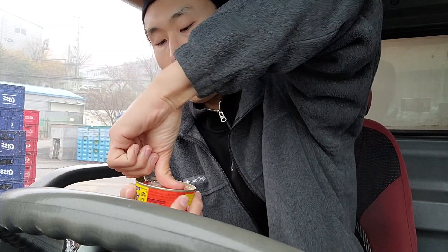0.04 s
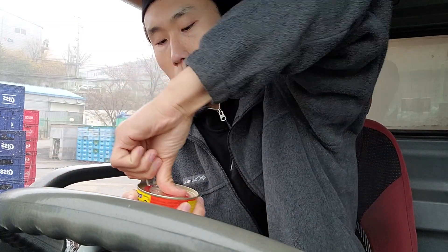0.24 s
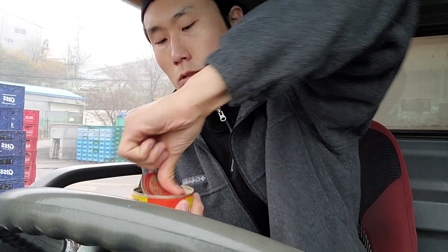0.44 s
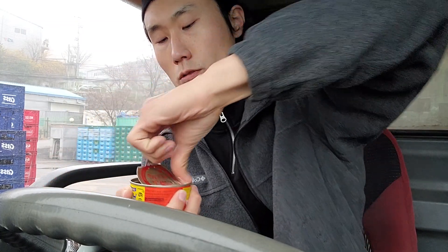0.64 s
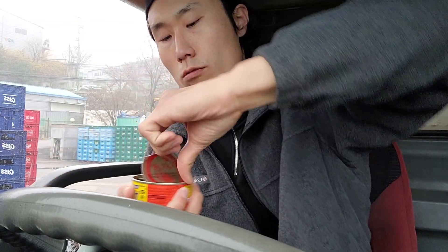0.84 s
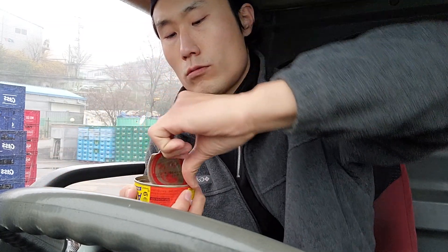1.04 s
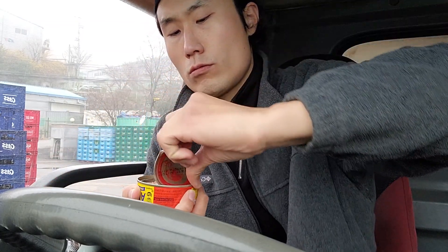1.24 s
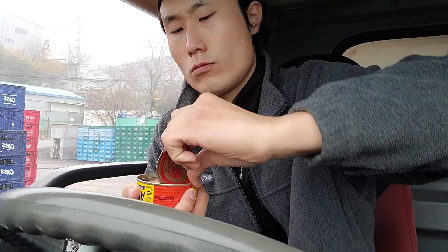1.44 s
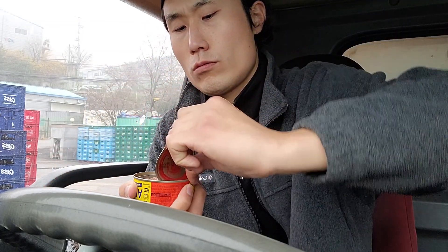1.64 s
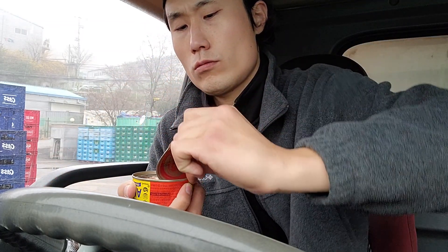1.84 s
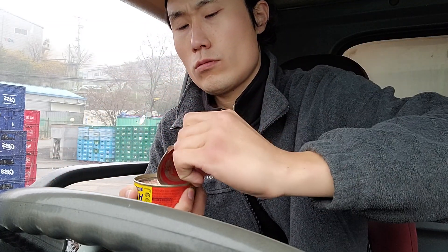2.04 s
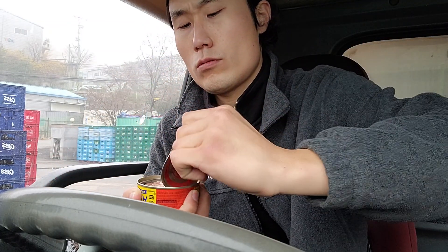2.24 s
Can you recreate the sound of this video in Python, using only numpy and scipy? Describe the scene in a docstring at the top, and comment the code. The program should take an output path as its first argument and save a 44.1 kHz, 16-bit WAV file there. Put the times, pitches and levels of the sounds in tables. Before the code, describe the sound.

Thin metal can lid cracks and tears in two quick pulls with bright ringing and gritty crackle, after a soft sleeve rustle; quieter pings, scrapes and ticks follow, close and dry, with a faint low vehicle-cab hum.

```python
"""Opening a ring-pull can in a parked cab

The scored rim cracks, then two pulls rip the lid: trains of tiny slips ring the thin metal while finer
fractures crackle. The bent lid flexes, ticks, scrapes and creases as brief slip clusters and clean rings.
Coloured noise makes a brushing sleeve, a dull rub and the cab's faint floor; a gliding sine is the low hum.
Decaying stereo noise gives the close cab's echoes."""
import sys
import numpy as np
from scipy import signal
from scipy.fft import rfft, irfft, next_fast_len
from scipy.io import wavfile
from scipy.ndimage import uniform_filter1d, map_coordinates

SR = 44100
rng = np.random.default_rng(int(sys.argv[2]) if len(sys.argv) > 2 else 0)


def put_to_file(sound):
    """Save the sound as 16-bit audio at rate SR, in the file named by the first command-line argument."""
    columns = np.atleast_2d(sound).T  # one column per channel
    safe = np.clip(columns, -1, 1)
    whole_steps = np.round(safe * 32767)
    wavfile.write(sys.argv[1], SR, whole_steps.astype(np.int16))


N = 101429
IR_SIZE = 8192  # samples

# lid resonances, nearly flat and curled up: centre_hz, width_hz, level_db
FLAT_LID_MODES = [(930, 90, -29), (1642, 80, -3), (1798.5, 45, 7.5), (1962, 25, 3.5), (2420, 96, -0.5),
                  (2850, 16, -7.5), (3184, 17, 0), (3447, 20, -4), (4045, 30, -9)]
CURLED_LID_MODES = [(335, 110, -23.5), (558, 140, -22), (1435, 43, -5.5), (1615, 81, -5), (1840, 61, 10.5),
                    (2175, 120, 0.5), (2356, 96, -6), (2419, 44, 1)]
# lid hinge resonances: centre_hz, width_hz, level_db
HINGE_RESONANCES = [(1316, 23, 1.5), (1740, 110, 0.5), (2910, 90, -2.5), (4380, 54, 5.5), (4833, 66, -2)]
# dry tick spectrum: freq_hz, level_db
DRY_TICK_COLOUR = [(100, -44), (300, 7.5), (800, -1.5), (1400, 3.5), (3000, -1.5), (7400, -13), (8900, -12),
                   (16000, -25.5)]

# slip rates are 1 / median interval; scatter is in slip size
SLIPS_PER_S, SLIP_SCATTER_DB = 420, 8
GRIT_PER_S, GRIT_SCATTER_DB = 750, 5
BLOW_S = .004  # a blow's or ping's dB is its level over this time
CRACK_S, SNAP_S, JERK_S = .0014, .0012, .0008  # slip cluster lengths; a jerk is almost a single slip
HINGE_RING_DB, CREASE_RING_DB, CRACK_RING_DB = -3, -3, -2  # metal ring re dry click
# echoes re direct sound
CAB_DB, LID_CAB_DB, SNAP_CAB_DB, CRACK_CAB_DB, TICK_CAB_DB = 6, -9, -3, -4.5, -0.5


def amp(db):
    """Decibels to gain."""
    return 10 ** (np.asarray(db) / 20)


def unit(x):
    """Scale to rms 1."""
    return x / np.sqrt(np.mean(x ** 2) + 1e-20)


def along(points, hz):
    """Interpolate (freq_hz, value) points on a log frequency axis."""
    freq_hz, value = np.transpose(points)
    return np.interp(np.log(hz + 1), np.log(freq_hz + 1), value)


def curves(rows, outside=None):
    """Interpolate each column after the time to one value per sample."""
    time_s, *columns = np.transpose(rows)
    t = np.arange(N) / SR
    return [np.interp(t, time_s, column, outside, outside) for column in columns]


def filtered(x, response):
    """Multiply the spectrum of x by a response of frequency."""
    n = x.shape[-1]
    m = next_fast_len(n + IR_SIZE)
    spectrum = rfft(x, m) * response(np.fft.rfftfreq(m, 1 / SR))
    return irfft(spectrum, m)[..., :n]


def ring(modes):
    """Impulse response of parallel resonances with alternating signs, energy 1."""
    f = np.fft.rfftfreq(IR_SIZE, 1 / SR)
    response = 0
    for k, (centre, width, db) in enumerate(modes):
        damping = 1j * f * width
        response = response + (-1) ** k * amp(db) * damping / (centre * centre - f * f + damping)
    h = irfft(response)
    h[IR_SIZE // 2:] = 0
    return h / np.linalg.norm(h)


def click(colour, tilt_db_per_octave=0):
    """Minimum-phase impulse of the given colour, energy 1, made by folding the cepstrum."""
    pivot_hz = 4600
    f = np.fft.rfftfreq(IR_SIZE, 1 / SR)
    octaves = np.log2(np.maximum(f / pivot_hz, 1 / 8))  # tilt stops 3 octaves below the pivot
    cepstrum = irfft(np.log(amp(along(colour, f) + tilt_db_per_octave * octaves)))
    cepstrum[1:IR_SIZE // 2] *= 2
    cepstrum[IR_SIZE // 2 + 1:] = 0
    h = irfft(np.exp(rfft(cepstrum)))
    return h / np.linalg.norm(h)


def diffuse(size):
    """Stereo noise, alike in the bass and unrelated in the treble, from weighted mid and side."""
    # freq_hz, left_right_correlation
    likeness = [(100, 0.8), (800, 0)]

    def mid_side_gains(hz):
        angle_rad = np.arccos(np.clip(along(likeness, hz), -1, 1)) / 2
        return np.array([np.cos(angle_rad), np.sin(angle_rad)])

    mid, side = filtered(rng.standard_normal((2, size)), mid_side_gains)
    return np.array([mid + side, mid - side])


def rush(colour):
    """Coloured stereo noise, rms 1."""
    return unit(filtered(diffuse(N), lambda hz: amp(along(colour, hz))))


def in_cab(x, echo_db):
    """Direct sound plus a short dense decaying answer from the cab's glass and panels."""
    t60_s, build_up_s = .07, .001
    t = np.arange(IR_SIZE) / SR
    tail = diffuse(IR_SIZE) * amp(-60 * t / t60_s) * (1 - np.exp(-t / build_up_s))
    h = amp(echo_db) * tail / np.linalg.norm(tail[0])
    h[:, 0] += 1
    return signal.fftconvolve(x[None], h / np.linalg.norm(h[0]), axes=1)[:, :N]


def placed(sound, start_s):
    """Put a stereo sound at its start time."""
    return np.pad(sound, ((0, 0), (round(start_s * SR), N)))[:, :N]


def blow(start_s, db, length_s, body, echo_db):
    """A brief dying cluster of separate slips excites a body."""
    u = np.arange(IR_SIZE // 2) / SR / length_s
    slips = rng.standard_normal(len(u)) ** 5 * u ** .2 * np.exp(-2 * u)  # 5th power: sparse spikes
    sound = in_cab(signal.fftconvolve(slips, body), echo_db)
    sound = amp(db) * sound * np.sqrt(2 * BLOW_S * SR / np.sum(sound ** 2))
    return placed(sound, start_s)


def ping(start_s, db, modes):
    """A clean impulse rings the metal, its modes in slightly new proportions each time."""
    mode_scatter_db = 3
    varied = [(hz, width, level + mode_scatter_db * rng.standard_normal()) for hz, width, level in modes]
    sound = in_cab(amp(db) * np.sqrt(BLOW_S * SR) * ring(varied), LID_CAB_DB)
    return placed(sound, start_s)


def slip_train(rate_per_s, scatter_db):
    """Stick-slip impulses at uneven intervals, of uneven size and random sign, rms 1."""
    draws = rng.standard_normal((12000, 2))
    intervals_s = np.exp(.5 * draws[:, 0]) / rate_per_s
    at = (np.cumsum(intervals_s) * SR).astype(int)
    sizes = amp(scatter_db * np.clip(draws[:, 1], -2, 2)) * rng.choice([-1, 1], len(at))
    return unit(np.bincount(at[at < N], sizes[at < N], N))


def hum():
    """A sine of gliding pitch swells and sags over faint cab noise."""
    # time_s, level_db
    hum_level = [(0, -55.5), (.06, -52), (.11, -65.5), (.2, -47), (.3, -51.5), (.5, -63), (.67, -46),
                 (.84, -50), (1.0, -62), (1.13, -63), (1.31, -49), (1.72, -58.5), (1.8, -77), (1.95, -57.5),
                 (2.3, -56)]
    # time_s, pitch_hz
    hum_pitch = [(0, 52.5), (.2, 56.38), (1.05, 56.19), (2.3, 49.2)]
    # freq_hz, level_db
    noise_colour = [(20, -9), (65, -6), (140, -21.5), (330, -22), (520, -30), (1250, -27.5), (1900, -34),
                    (2800, -47), (6000, -57.5), (16000, -68)]
    noise_db = -59.5
    level_db, = curves(hum_level)
    pitch_hz, = curves(hum_pitch)
    tone = np.sqrt(2) * np.sin(2 * np.pi * np.cumsum(pitch_hz) / SR)
    return amp(level_db) * tone + amp(noise_db) * rush(noise_colour)


def sleeve():
    """Cloth friction hisses as the arm strains, and rubs dully when the grip shifts."""
    # time_s, level_db
    cloth_level = [(0, -60), (.13, -58), (.2, -51), (.3, -59.5), (.56, -62.5), (.64, -79.5), (.8, -79.5)]
    # freq_hz, level_db
    cloth_colour = [(200, -5.5), (900, -13.5), (1400, -2.5), (2600, 0.5), (3700, -5.5), (4400, 1.5),
                    (5200, -4.5), (8800, -6.5), (12000, -13), (16000, -14.5)]
    # freq_hz, level_db
    rub_colour = [(30, -6), (90, -5.5), (200, -2.5), (350, -9), (800, -25), (4000, -47.5)]
    rub_peak_s, rub_half_width_s, rub_db = 1.19, .045, -57
    level_db, = curves([*cloth_level, (N / SR, -150)])
    cloth = in_cab(amp(level_db) * rush(cloth_colour)[0], CAB_DB)
    t = np.arange(N) / SR
    rub_gain = amp(rub_db) / (1 + ((t - rub_peak_s) / rub_half_width_s) ** 2)
    return cloth + rub_gain * rush(rub_colour)


def rim_cracks():
    """The scored rim breaks in dry slip clusters that ring the still closed can."""
    # start_s, level_db
    crack_rows = [(0.2186, -22.5), (0.2204, -22.5), (.2262, -33)]
    # freq_hz, level_db
    crack_colour = [(400, -34.5), (1100, -13.5), (2000, -9), (4000, -0.5), (7000, -14), (8700, 2),
                    (10000, -9), (16000, -4.5)]
    # centre_hz, width_hz, level_db
    closed_can_modes = [(870, 94, -14.5), (1640, 90, -5.5), (2408, 75, 1), (3570, 120, -4.5),
                        (3970, 59, 8.5), (6050, 230, -4)]
    out = np.zeros((2, N))
    for start_s, db in crack_rows:
        out += blow(start_s, db, CRACK_S, click(crack_colour), CRACK_CAB_DB)
        out += ping(start_s, db + CRACK_RING_DB, closed_can_modes)
    return out


def lid_strains():
    """Short slip clusters ping the flat lid under strain before it rips."""
    # start_s, level_db
    strain_rows = [(0.284, -50.5), (0.3329, -40), (0.3482, -36.5)]
    return sum(blow(start_s, db, SNAP_S, ring(FLAT_LID_MODES), LID_CAB_DB) for start_s, db in strain_rows)


def pull(force, lid_modes, tear_colour):
    """The score line rips: coarse slips ring the lid, fine fractures crackle in clumps."""
    even_s, clump_s, clump_db = .009, .005, 3
    ring_db, tear_db = curves(force, outside=-150)
    slips = slip_train(SLIPS_PER_S, SLIP_SCATTER_DB)
    swing = unit(signal.fftconvolve(slips, ring(lid_modes))[:N])
    # even out the ring's loudness over about even_s, so that ring_db sets it
    local_power = np.abs(uniform_filter1d(swing ** 2, int(even_s * SR) + 1))
    swing = swing / np.sqrt(local_power + 1e-3)
    drift = uniform_filter1d(rng.standard_normal(N), int(clump_s * SR))
    drift = unit(drift - uniform_filter1d(drift, int(2 * clump_s * SR)))
    clump_gain = amp(clump_db * np.minimum(drift, 1))
    fractures = unit(clump_gain * slip_train(GRIT_PER_S, GRIT_SCATTER_DB))
    tearing = signal.fftconvolve(amp(tear_db) * fractures, click(tear_colour))[:N]
    return in_cab(amp(ring_db) * swing, LID_CAB_DB) + in_cab(tearing, CAB_DB)


def first_pull():
    """Slips and fractures rip the nearly flat lid."""
    # time_s, ring_db, tear_db
    force = [(.349, -68, -56.5), (.355, -42.5, -54), (.357, -27, -31.5), (.378, -27, -33.5),
             (.398, -27, -23.5), (.409, -26.5, -18.5), (.428, -22, -22.5), (.445, -30, -27.5),
             (.466, -43.5, -48), (.49, -40.5, -51.5), (.515, -73, -69)]
    # freq_hz, level_db
    tear_colour = [(100, -35.5), (300, -25), (700, -19), (1500, -5), (2650, -4.5), (3200, 5.5), (4100, 0),
                   (5200, -5.5), (7000, -18), (7900, -18.5), (8600, -5.5), (10200, -17), (12000, -11),
                   (16000, -16.5)]
    return pull(force, FLAT_LID_MODES, tear_colour)


def lid_snaps():
    """The lid gives way at the height of the first pull: slip clusters ring broad resonances."""
    # start_s, level_db
    snap_rows = [(0.422, -18), (.4250, -14.5)]
    # centre_hz, width_hz, level_db
    snap_modes = [(481.9, 150, -24), (888, 85, -9.5), (1100, 100, -10), (1723, 140, -2), (2480, 200, -6),
                  (3040, 200, 0.5), (3580, 120, 4), (4450, 99, -6)]
    return sum(blow(start_s, db, SNAP_S, ring(snap_modes), SNAP_CAB_DB) for start_s, db in snap_rows)


def second_pull():
    """Slips and fractures rip the curled lid."""
    # time_s, ring_db, tear_db
    force = [(.797, -27, -55), (.801, -54, -25.5), (.811, -43.5, -45.5), (.83, -31, -33.5),
             (.86, -29, -36.5), (.881, -52, -41), (.889, -46, -37.5), (.925, -78, -90)]
    # freq_hz, level_db
    tear_colour = [(100, -54), (320, 7.5), (800, -12), (2000, 9.5), (2750, 1.5), (3300, 9), (4300, 6.5),
                   (5400, 3), (7300, -4.5), (8800, 2), (10000, -4), (16000, -4)]
    return pull(force, CURLED_LID_MODES, tear_colour)


def lid_jerks():
    """The curled lid jerks free during the second pull, rung by very short slip clusters."""
    # start_s, level_db
    jerk_rows = [(0.7993, -27), (0.8129, -25), (.8255, -22.5), (.8370, -25.5), (0.853, -26), (0.8687, -26),
                 (.889, -27)]
    return sum(blow(start_s, db, JERK_S, ring(CURLED_LID_MODES), LID_CAB_DB) for start_s, db in jerk_rows)


def ticks(rows, modes, ring_db):
    """Each tick is a dry slip cluster with a short metallic ring."""
    out = np.zeros((2, N))
    for start_s, db, length_s, tilt_db_per_octave in rows:
        body = click(DRY_TICK_COLOUR, tilt_db_per_octave)
        out += blow(start_s, db, length_s, body, TICK_CAB_DB)
        out += ping(start_s, db + ring_db, modes)
    return out


def hinge_ticks():
    """The hinge slips and rings as the lid is bent back."""
    # start_s, level_db, length_s, tilt_db_per_octave
    tick_rows = [(1.0266, -48, 0.039, 0.5), (1.099, -47.5, 0.02, 1.5), (1.147, -52, 0.0021, -1.5),
                 (1.164, -50.5, 0.011, 1), (1.2595, -47.5, 0.0034, 4), (1.277, -51, 0.0038, 1.5),
                 (1.3175, -58.5, 0.0021, 3), (1.3525, -56.5, 0.0035, 2), (1.3923, -53.5, 0.016, -3.5),
                 (1.433, -62.5, 0.0023, 1), (1.4856, -56, 0.019, 0), (1.549, -65, 0.0035, 6)]
    return ticks(tick_rows, HINGE_RESONANCES, HINGE_RING_DB)


def lid_flexes():
    """The curled lid flexes with clean rings."""
    # start_s, level_db
    flex_rows = [(1.027, -38), (1.0443, -46), (1.053, -38), (1.073, -56), (1.105, -52), (1.226, -55)]
    # centre_hz, width_hz, level_db
    flex_modes = [(1118, 27, 1), (1825, 18, 19), (2360, 240, -13)]
    return sum(ping(start_s, db, flex_modes) for start_s, db in flex_rows)


def hinge_scrape():
    """A faint slip train excites the dry click and the ring of the hinge."""
    # time_s, level_db
    scrape_level = [(1.03, -58), (1.17, -62.5), (1.2, -78), (1.55, -83)]
    level_db, = curves(scrape_level, outside=-150)
    slips = amp(level_db) * slip_train(SLIPS_PER_S, SLIP_SCATTER_DB)
    body = click(DRY_TICK_COLOUR) + amp(HINGE_RING_DB) * ring(HINGE_RESONANCES)
    return in_cab(signal.fftconvolve(slips, body)[:N], TICK_CAB_DB)


def lid_creases():
    """The folded-back lid creases in dry ticks with its own ring."""
    # start_s, level_db, length_s, tilt_db_per_octave
    crease_rows = [(1.6487, -58.5, 0.002, 2), (1.697, -60.5, 0.015, 5.5), (1.7295, -46, 0.0034, 6),
                   (1.8242, -57, 0.0045, 2), (2.2395, -71.5, 0.0048, 5)]
    # centre_hz, width_hz, level_db
    folded_lid_modes = [(2398, 34, -3), (4090, 106, 2.5), (4560, 22.6, -9.5), (4970, 64, -5)]
    return ticks(crease_rows, folded_lid_modes, CREASE_RING_DB)


def port_phases(hz):
    """Phase lead of the left microphone over the right, uneven along frequency."""
    # freq_hz, mean_lead_rad
    mean_lead = [(900, 0.39), (2300, 1.65)]
    spread, step_hz = .45, 450
    uneven = map_coordinates(rng.standard_normal(IR_SIZE), [hz / step_hz])
    lead_rad = along(mean_lead, hz) * (1 + spread * uneven)
    return np.exp(1j * np.outer([.5, -.5], lead_rad))


def can():
    """All sounds of the metal, sharing one set of left-right phase differences."""
    opening = rim_cracks() + lid_strains()
    ripping = first_pull() + lid_snaps() + second_pull() + lid_jerks()
    bending = hinge_ticks() + lid_flexes() + hinge_scrape() + lid_creases()
    return filtered(opening + ripping + bending, port_phases)


def scene():
    """The can and the arm a little to the left, the hum central in diffuse cab noise."""
    # freq_hz, left_over_right_db
    left_lean = [(400, 1), (1400, 2.5), (8700, 3)]
    near = filtered(can() + sleeve(), lambda hz: amp(np.outer([.5, -.5], along(left_lean, hz))))
    return near + hum()


def record(dry):
    """A very steep low-pass at the band limit."""
    top_hz = 15850
    return filtered(dry, lambda hz: 1 / np.sqrt(1 + (hz / top_hz) ** 300))


dry = scene()
out = record(dry)
put_to_file(out)
```